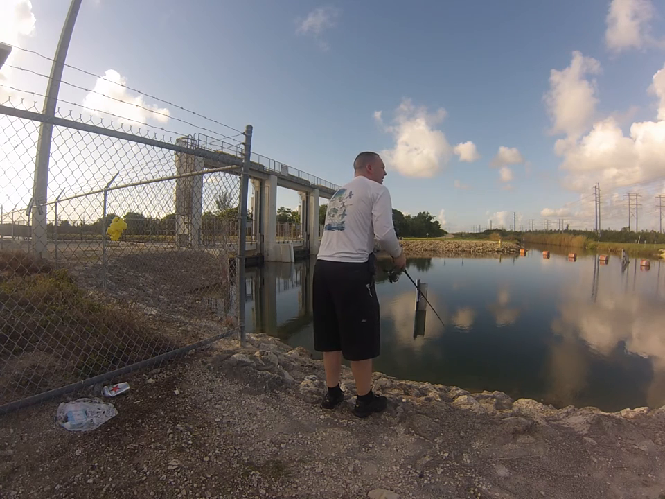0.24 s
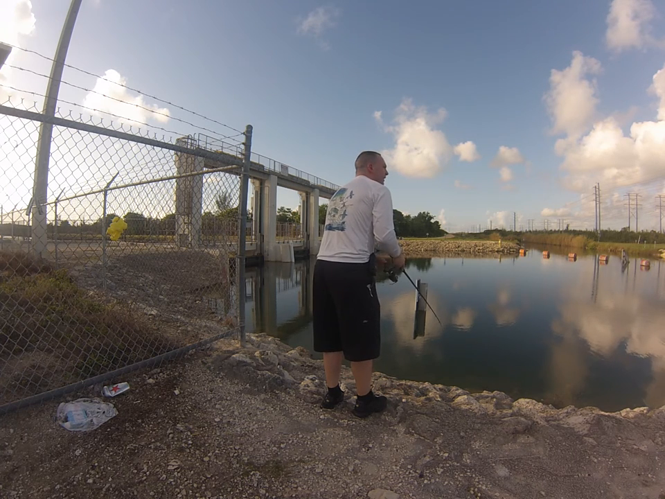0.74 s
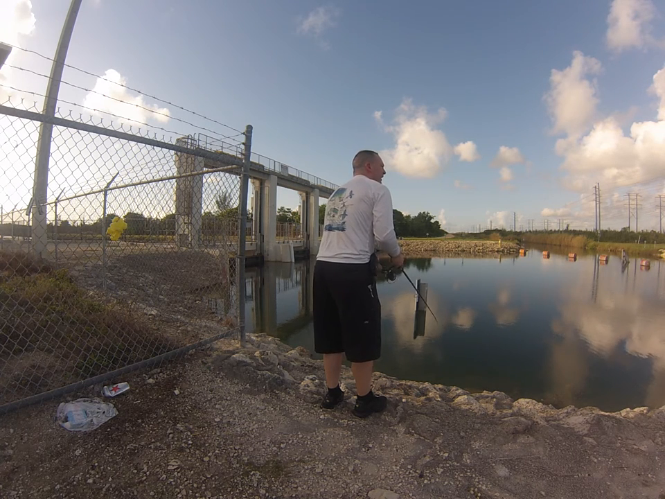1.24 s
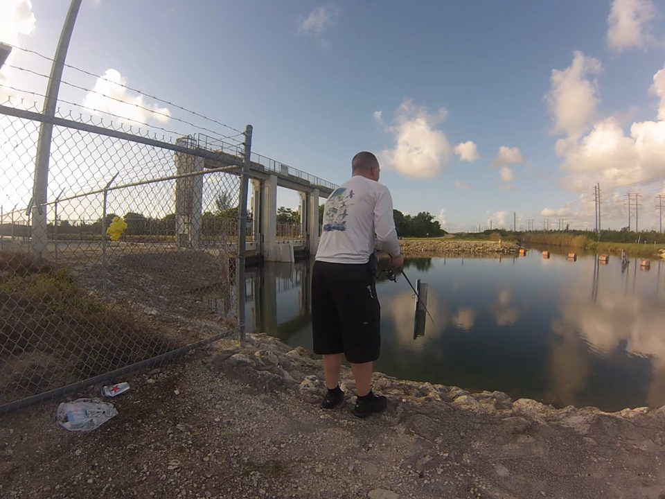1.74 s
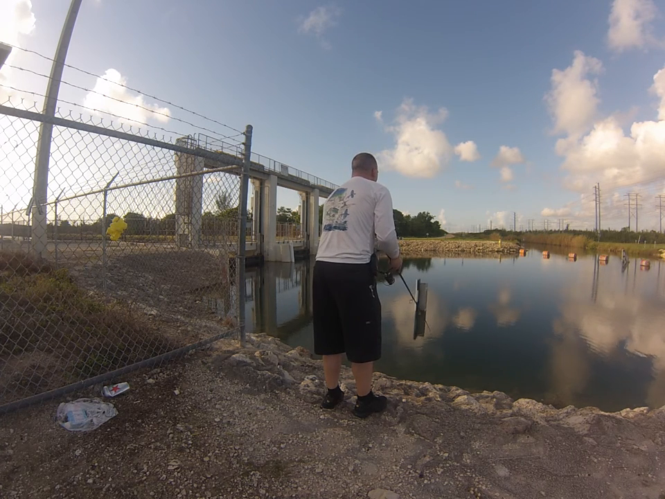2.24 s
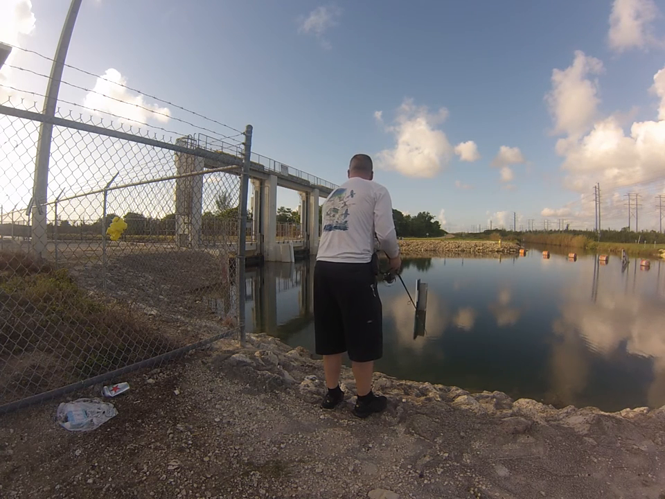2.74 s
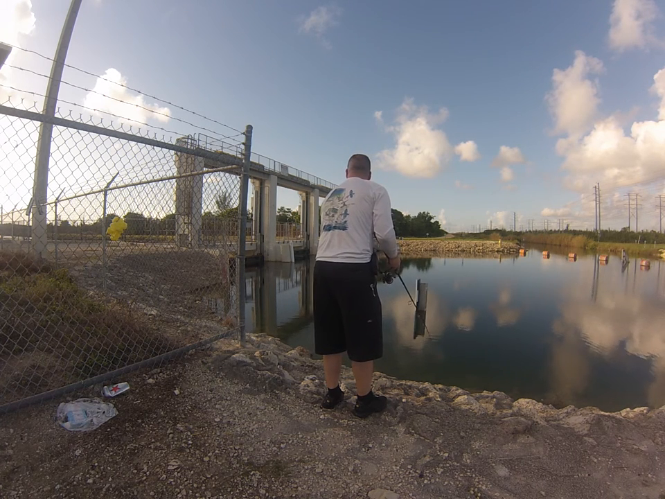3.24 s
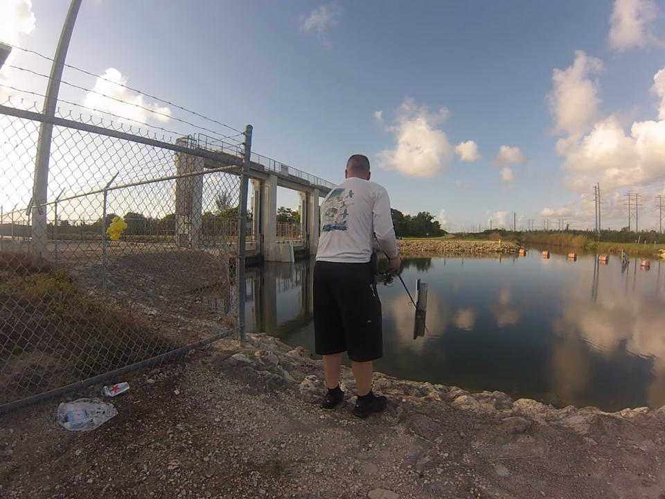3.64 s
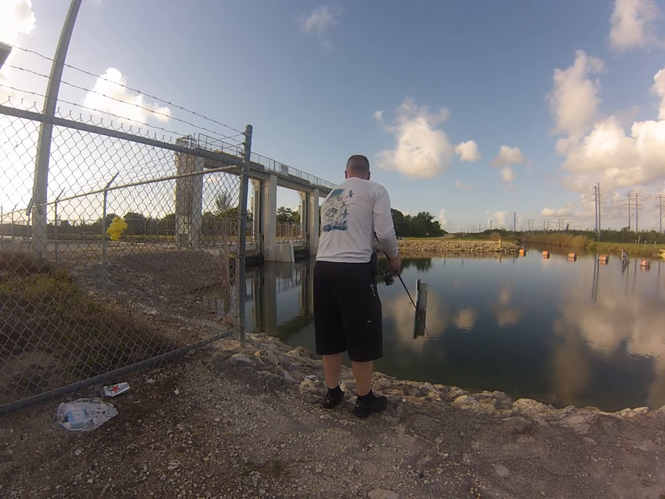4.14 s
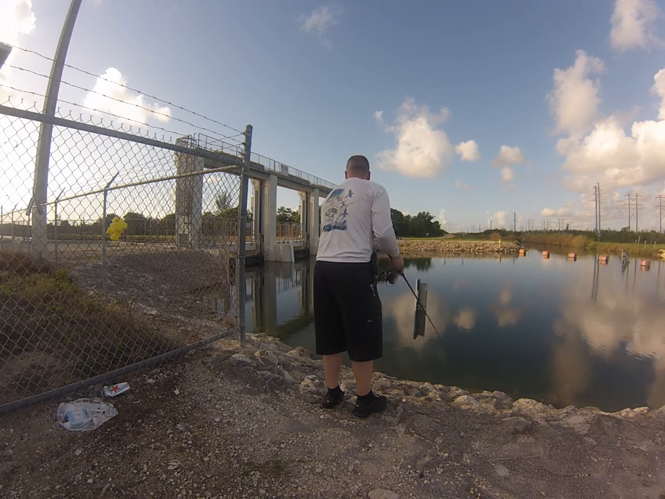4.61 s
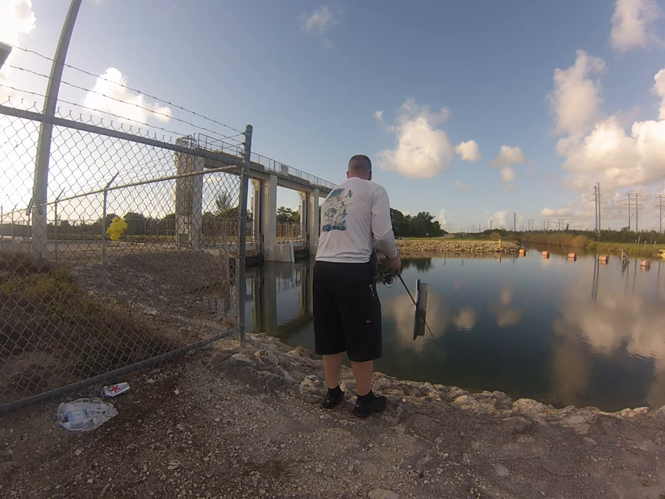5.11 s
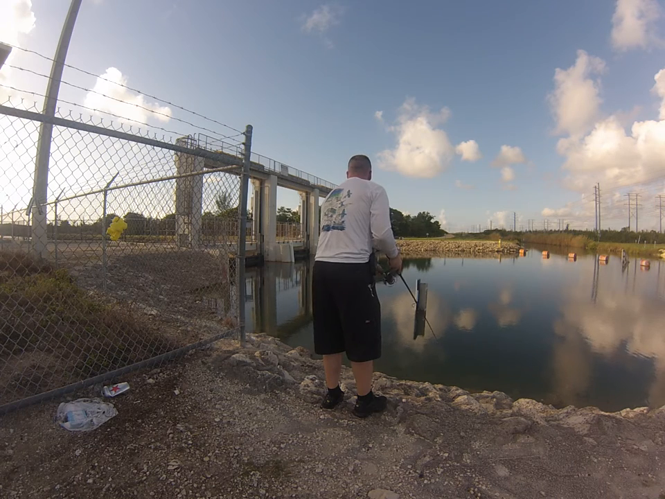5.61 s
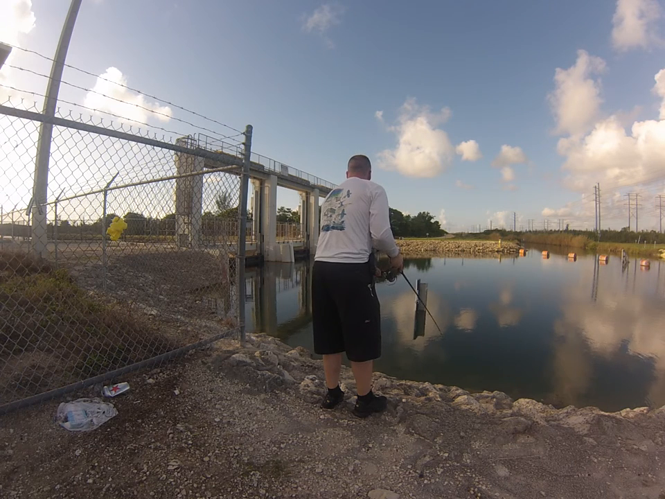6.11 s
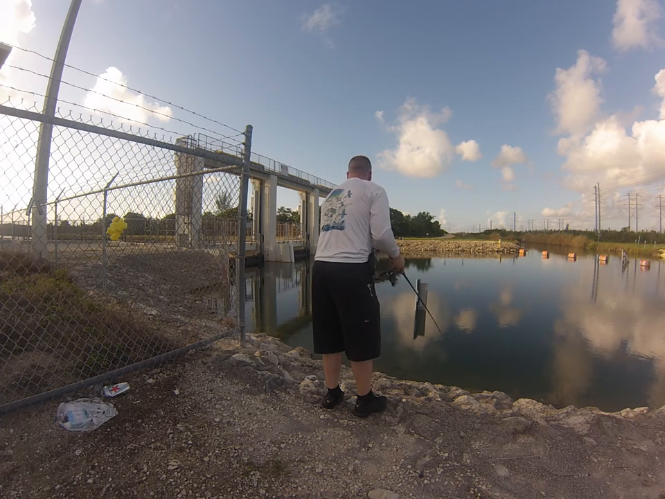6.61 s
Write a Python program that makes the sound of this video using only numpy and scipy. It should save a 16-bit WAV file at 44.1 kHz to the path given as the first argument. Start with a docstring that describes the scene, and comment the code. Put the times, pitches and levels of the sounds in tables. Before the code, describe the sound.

Beside still water outdoors, a distant electric pump runs unchanged for nearly seven seconds: a steady stack of hums around 90, 120 and 360 hertz, with thinner whines up to about 2 kilohertz, gently throbbing and wavering. Far engines add a deep drone, swelling around 1 second and again near 5.9. A light breeze rumbles low on the microphone, with soft thuds at 0.1 and 0.3 seconds, a cluster from 1.0 to 1.65 with the strongest near 1.17, and more around 2.2, 2.5 and 3.1; afterwards it is calmer, with a small swell near 6.5. Faint reel ticks come at 0.6, 1.7 and 6.5 seconds. Tiny high flickers brush past at 0.5, 2.4, 2.7, 2.9 and 3.9. Soft broad hiss, a thin shimmer of far insects and minute rising water plinks continue throughout. The hum is centred; the treble hiss is slightly wide.

```python
"""Sluice pump across still water

A four-pole induction motor with twelve vanes sings multiples of its shaft rate, and its magnetic hum beats
against them. Far engines drone in narrow noise bands; a breeze rumbles and pops on the microphone as low noise
and single pressure dips. Far land and insects hiss as coloured noise, and the water's edge plinks in faint rising
tones. A fishing reel ticks three times and the treble flickers briefly near 13 kHz, both as short rough tones.
"""
import sys
import numpy as np
from scipy.fft import rfft, irfft, next_fast_len
from scipy.io import wavfile
from scipy.ndimage import map_coordinates

SR = 44100
rng = np.random.default_rng(int(sys.argv[2]) if len(sys.argv) > 2 else 0)


def log_audio(samples):
    """Write samples as a 16-bit WAV file to the path given in sys.argv[1]."""
    # one column per channel
    frames = np.atleast_2d(samples).T
    # limit to full scale, then quantise
    limited = np.clip(frames, -1, 1)
    pcm = np.round(limited * 32767).astype(np.int16)
    wavfile.write(sys.argv[1], SR, pcm)


N = 302526  # length in samples


def amp(db):
    """Gain of a level in dB."""
    return 10 ** (np.asarray(db) / 20)


def unit(x):
    """Scaled to rms 1."""
    return x / np.sqrt(np.mean(x ** 2) + 1e-20)


def along(points, hz):
    """Values of (Hz, value) points, read on a log frequency axis."""
    point_hz, value = np.transpose(points)
    return np.interp(np.log(hz + 1), np.log(point_hz + 1), value)


def wobble(rate):
    """A smooth random curve with `rate` random knots a second."""
    knots = rng.standard_normal(int(N * rate / SR) + 4)
    return map_coordinates(knots, [np.arange(N) * rate / SR])


def filtered(x, response):
    """x shaped by a response of frequency, with padding so that its end does not wrap round."""
    padded = next_fast_len(N + 8192)
    hz = np.fft.rfftfreq(padded, 1 / SR)
    return irfft(rfft(x, padded) * response(hz), padded)[..., :N]


def noise_band(centre_hz, width_hz):
    """Noise of rms 1 in a narrow bell-shaped band."""
    bell = lambda hz: np.exp(-((hz - centre_hz) / width_hz) ** 2)
    return unit(filtered(rng.standard_normal(N), bell))


# Stereo width of the noises at the microphone. Each row: frequency in Hz, side signal against mid in dB.
STEREO_WIDTH = [(2300, -47), (2900, -17), (4000, -9.5), (8000, -8.5), (15000, -6.5)]


def noise(spectrum):
    """Stereo coloured noise of rms 1, centred in the bass and wider in the treble."""
    def colour(hz):
        mid_gain = amp(along(spectrum, hz)) * (hz > spectrum[0][0])
        return mid_gain * [np.ones_like(hz), amp(along(STEREO_WIDTH, hz))]

    mid, side = filtered(rng.standard_normal((2, N)), colour)
    return unit(np.array([mid + side, mid - side]))


SHAFT_HZ, VANES = 29.76132, 12
MAGNET_HZ = 119.9917  # twice the supply frequency
IN_STEP_S = .072  # a moment when magnetic hum and vane tone add up
FAINT_DB, THIRD_DB, SCATTER_DB = -92, 9, 3.5  # other multiples up to the 88th; every third is stronger
HIGH_VANE_DB = -93  # vane tones above those
THROB_DEPTH, THROB_TOP = .6, 18  # low multiples not divisible by three, below the 18th, throb
TURN_LAG_RAD = .3  # each vane tone swells once a turn, every higher one this much later in the turn
WAVER_RAD = 2.3  # 0 = that swell is all loudness, pi = all pitch
# Strong shaft tones heard across the water. Each row: multiple of the shaft rate, rms level in dB before throb.
SHAFT_TONES = [(3, -58.0), (5, -72.1), (8, -78), (9, -71.3), (10, -74.7), (11, -76), (12, -57.6),
               (14, -76.7), (15, -66.6), (16, -67.1), (17, -75), (18, -75.0), (24, -75.3), (27, -68.2),
               (30, -78.2), (33, -78.3), (36, -67.8), (48, -61.9), (49, -74.3), (57, -78.9), (59, -76.3),
               (60, -58.3), (63, -74.3), (70, -77.5), (71, -73.9), (72, -62.5), (73, -77.0), (74, -82),
               (84, -69.3)]
# Magnetic hum of the motor. Each row: multiple of the magnetic rate, rms level in dB.
MAGNETIC_HUM = [(2, -70.2), (3, -61.3), (4, -77.3), (5, -84), (6, -82)]
# Noisy skirts, as no turn is quite like the last. Each row: frequency in Hz, relative density in dB per Hz.
SKIRT_COLOUR = [(180, -26.5), (260, -2.5), (500, 1.5), (600, -14.5), (820, -2.5), (1000, -17), (1300, -9.5),
                (1800, -20.5), (2500, -26), (2800, -36.5)]


def pump_phases():
    """Start phases, in which the neighbours of each vane tone make it swell and waver as the shaft turns."""
    start = rng.uniform(0, 2 * np.pi, size=200)
    # each vane pulse is smeared into a short glide
    start[::VANES] = -.6 * np.arange(len(start[::VANES])) ** 2
    vane_phase = start[VANES:189:VANES]
    lag = TURN_LAG_RAD * np.arange(1, 16)
    for side in (-1, 1):
        # once a turn, in loudness and pitch
        start[VANES + side:190:VANES] = vane_phase - side * lag + WAVER_RAD / 2
        # and twice a turn in loudness
        start[VANES + 2 * side:190:VANES] = vane_phase
    return start


def pump():
    """Tones at shaft multiples throb with the slip, beat with magnetic hum and waver a little in moving air."""
    t = np.arange(N) / SR
    shaft = 2 * np.pi * SHAFT_HZ * (t + 2.5e-5 * wobble(.7))
    slip = 2 * np.pi * (MAGNET_HZ - 4 * SHAFT_HZ) * (t - IN_STEP_S)  # four poles pass the field
    start = pump_phases()

    levels = {k: FAINT_DB + THIRD_DB * (k % 3 == 0) + rng.normal(0, SCATTER_DB) for k in range(19, 89)}
    levels |= {k: HIGH_VANE_DB for k in range(96, 181, VANES)}
    levels |= dict(SHAFT_TONES)

    def throb(k):
        """Swell as each pole passes, odd and even multiples in turn."""
        if k % 3 and k < THROB_TOP:
            return 1 + THROB_DEPTH * (-1) ** k * np.cos(slip)
        return 1

    tones = sum(amp(db) * throb(k) * np.sin(k * shaft + start[k]) for k, db in levels.items())
    tones += sum(amp(db) * np.sin(m * (4 * shaft + slip) + start[4 * m]) for m, db in MAGNETIC_HUM)

    def skirt_response(hz):
        off_hz = (hz + SHAFT_HZ / 2) % SHAFT_HZ - SHAFT_HZ / 2  # distance from the nearest multiple
        return amp(along(SKIRT_COLOUR, hz)) * np.exp(-(off_hz / 7.2) ** 2)

    skirts = unit(filtered(rng.standard_normal(N), skirt_response))
    return np.sqrt(2) * amp(0.35 * wobble(4.6)) * tones + amp(-64.0) * skirts  # sqrt(2): rms to peak


# Swell of the distant engines. Each row: time in seconds, level in dB.
ENGINE_SWELL = [(0.0, -50.5), (0.63, -53), (1.09, -46), (2.41, -50), (2.64, -56.5), (3.74, -53),
                (4.76, -57.5), (5.88, -47.5), (6.86, -58)]
# Their low drones. Each row: centre in Hz, width in Hz, level in dB relative to the swell.
ENGINE_BANDS = [(30.3, 5.5, -1.5), (44.3, 3.2, -10.5), (57.2, 4.2, -8)]


def drones():
    """Distant engines: narrow noise bands swell and fade together, and a steadier one lies above them."""
    seconds, db = np.transpose(ENGINE_SWELL)
    swell = amp(np.interp(np.arange(N) / SR, seconds, db))
    low = sum(amp(level_db) * noise_band(hz, width_hz) for hz, width_hz, level_db in ENGINE_BANDS)
    return swell * low + amp(-66.5) * noise_band(124.7, 2.1)


# Wind rumble on the microphone. Each row: time in seconds, level in dB.
BREEZE_LEVEL = [(0, -41), (.17, -57), (.45, -60), (.8, -47), (1.1, -44), (1.45, -54.5), (2.05, -48),
                (2.45, -51), (2.8, -45), (3.2, -51), (3.5, -53.5), (4.5, -52.5), (4.85, -57), (5.2, -53),
                (6.0, -57.5), (6.55, -49.5), (6.86, -57)]
# Colour of that rumble. Each row: frequency in Hz, relative density in dB per Hz.
RUMBLE_COLOUR = [(6, -29), (15, -3), (30, 0), (60, -3.5), (100, -11.5), (160, -20.5), (230, -42),
                 (400, -67.5)]
# Pressure dips of single eddies on the microphone. Each row: centre in seconds, depth in dB, width in ms,
# lean (no unit; the rebound is mostly before the dip at -1, after it at 1).
EDDY_POPS = [(0.098, -35.5, 8.5, .1), (0.283, -31.5, 10, 0.18), (1.0076, -37, 5.8, .4),
             (1.03, -36, 12, -.3), (1.0676, -37, 6.4, 0.23), (1.1075, -40, 4.4, 0.24),
             (1.153, -33, 4.6, 1.1), (1.1659, -24.3, 3.4, -1.35), (1.2981, -30, 4.7, 0.57),
             (1.3213, -38, 10, .1), (1.455, -28.5, 5.8, .1), (1.583, -33.5, 9.4, .1),
             (1.6366, -31.5, 12.7, 0.4), (2.1498, -37, 6.4, .1), (2.1866, -33.5, 6.8, .1),
             (2.251, -34, 13, .1), (2.5071, -35, 11.8, -0.095), (3.137, -39, 8.6, .1)]


def breeze():
    """Lumpy low turbulence, the same on both channels, with single eddies as one-swing pops."""
    seconds, db = np.transpose(BREEZE_LEVEL)
    t = np.arange(N) / SR
    lumpy = unit(amp(1.5 * wobble(14)) * noise(RUMBLE_COLOUR)[0])
    wind = amp(np.interp(t, seconds, db)) * lumpy
    for at, depth_db, width_ms, lean in EDDY_POPS:
        u = np.clip((t - at) / (width_ms / 1000), -9, 9)
        swing = 1 - 2 * lean * u - 2.8 * u ** 2  # one dip between two rebounds
        wind -= amp(depth_db) * swing * np.exp(-1.5 * abs(u) ** 1.93)
    return wind


# Broad noise of pump, water and far land. Each row: frequency in Hz, relative density in dB per Hz.
AIR_COLOUR = [(60, -15.5), (150, 0.5), (260, 2), (345, -2), (410, 5), (480, 2.5), (600, -5.5), (900, -5.5),
              (1500, -6.5), (2600, -11.5), (4000, -15.5), (7800, -19), (12000, -23.5), (15500, -26)]
# Insects far off. Each row: frequency in Hz, relative density in dB per Hz.
INSECT_COLOUR = [(7600, -36), (8100, -6), (8500, -3), (8850, -0.5), (9100, -5.5), (9400, -24)]


def land():
    """Nearly even broad noise, and a narrow treble band of insects that shimmers quickly."""
    air = amp(-60 + 0.2 * wobble(5)) * noise(AIR_COLOUR)
    shimmer_db = 0.82 * wobble(70) + 0.5 * wobble(1.4)
    return air + amp(-76.5 + shimmer_db) * noise(INSECT_COLOUR)


def droplets(count=60):
    """Tiny plinks from the water's edge: short soft rising tones barely above the hiss."""
    out, t = np.zeros(N + SR), np.arange(SR // 40) / SR
    for when, pitch, size in rng.uniform(size=(count, 3)):
        hz = 3000 * 1.4 ** pitch
        tone = np.sin(2 * np.pi * hz * t * (1 + 4 * t))
        swell = np.sin(np.pi * np.clip(t / .012, 0, 1)) ** 2  # up and down within 12 ms
        out[int(when * N):][:len(t)] += amp(-78 + 10 * size ** 2) * tone * swell
    return out[:N]


OFF_DB_PER_OCTAVE = 15  # how much less a tone sounds away from the burst's centre
# Faint ticks of the reel (centres up to 7000 Hz), and brief treble flickers near 13 kHz (centres from 12000 Hz).
# Each row: start in seconds, level in dB before onset, centre of the burst's colour in Hz.
TICKS_AND_FLICKERS = [(.481, -56, 14000), (.6096, -44, 4700), (1.6795, -54, 7000), (2.376, -51, 12000),
                      (2.685, -52, 13000), (2.871, -51, 13500), (3.887, -50, 13500), (6.5338, -43, 5300)]
# Tones that make up each burst. Each row: frequency in Hz, time to fall 60 dB in seconds,
# random phase step per sample in radians.
BURST_TONES = [(4200, .010, .42), (7200, .011, .2), (12800, .006, .6)]


def ticks_and_flickers():
    """Each reel tick or treble flicker is three rough dying tones, loudest in those near the burst's centre."""
    out, t = np.zeros(N + SR), np.arange(SR // 20) / SR
    onset = 1 - np.exp(-t / 0.00069)
    for start_s, level_db, centre_hz in TICKS_AND_FLICKERS:
        burst = np.zeros(len(t))
        for hz, t60, scatter in BURST_TONES:
            tone_db = level_db - OFF_DB_PER_OCTAVE * abs(np.log2(hz / centre_hz)) - 60 * t / t60
            rough_phase = np.cumsum(rng.normal(0, scatter, t.shape))
            burst += amp(tone_db) * np.sin(2 * np.pi * hz * t + rough_phase)
        out[round(start_s * SR):][:len(t)] += burst * onset
    return out[:N]


def scene():
    """All sources together: only the noise of land and insects differs between the channels."""
    return pump() + drones() + breeze() + land() + droplets() + ticks_and_flickers()


def record(dry):
    """The microphone's recorder keeps nothing from its band limit of 15250 Hz upwards."""
    return filtered(dry, lambda hz: hz < 15250)


dry = scene()
out = record(dry)
log_audio(out)
```